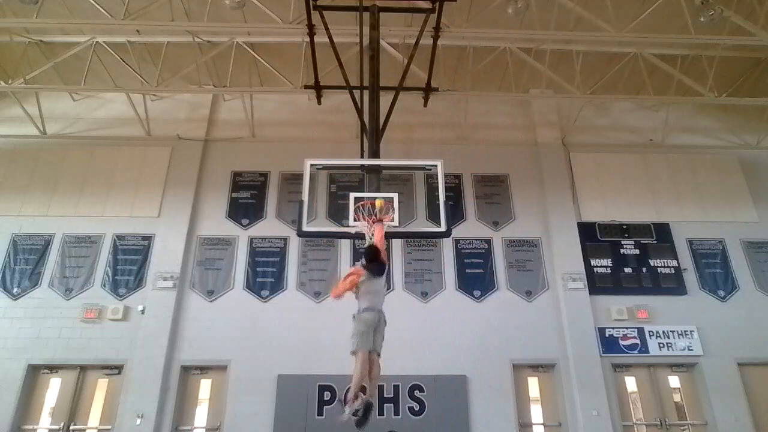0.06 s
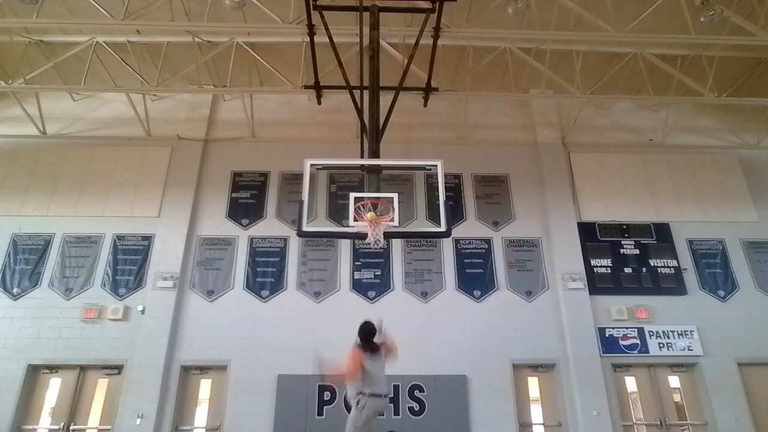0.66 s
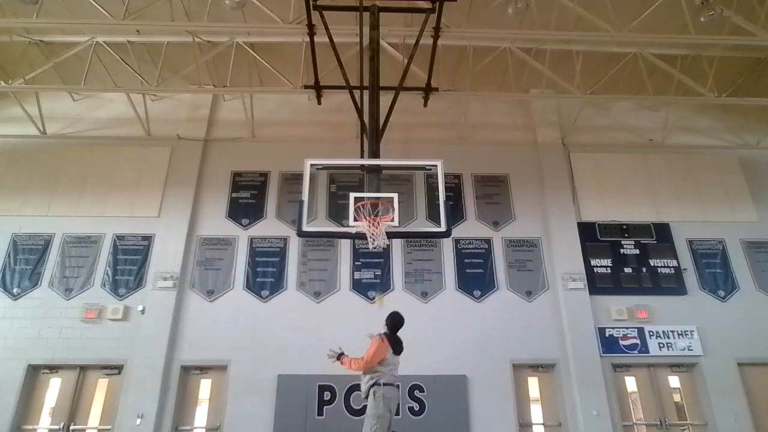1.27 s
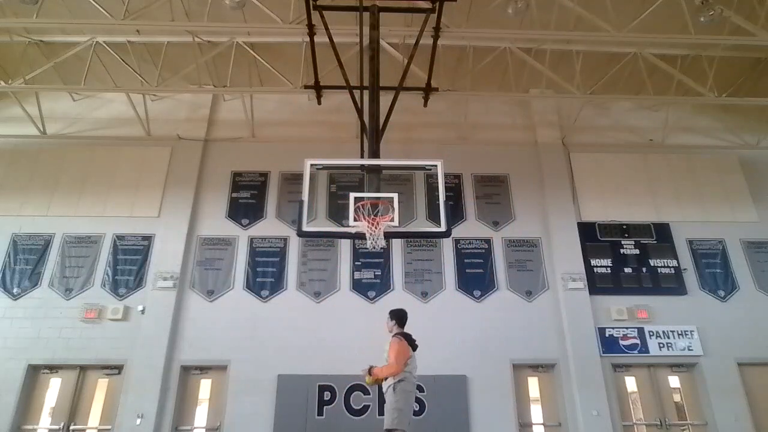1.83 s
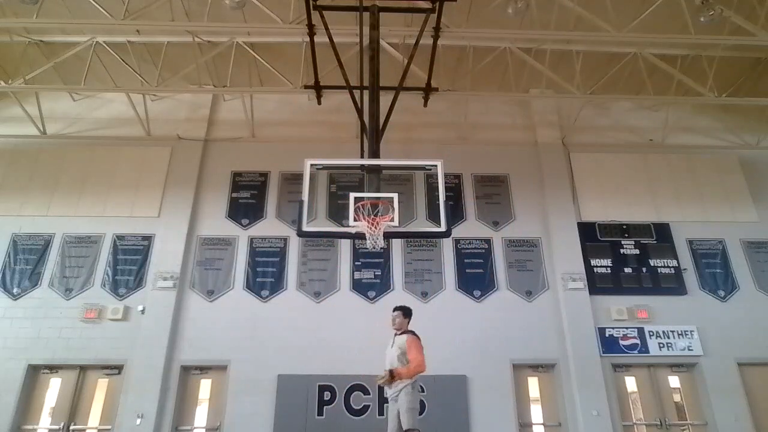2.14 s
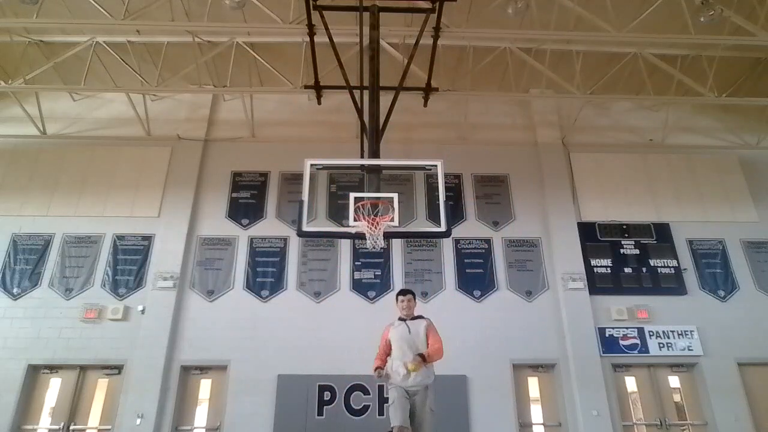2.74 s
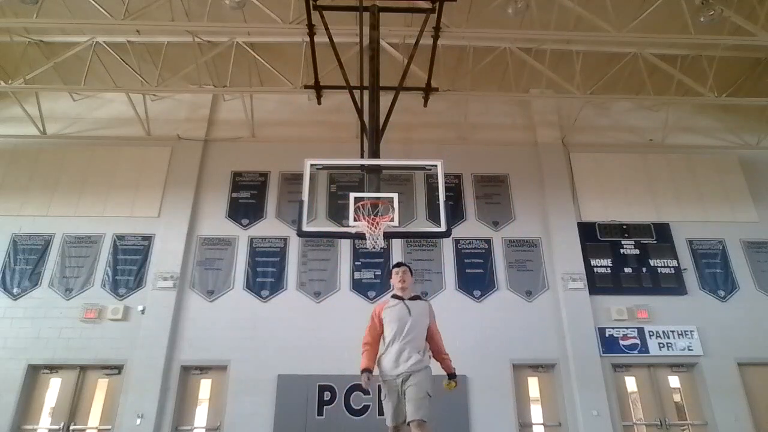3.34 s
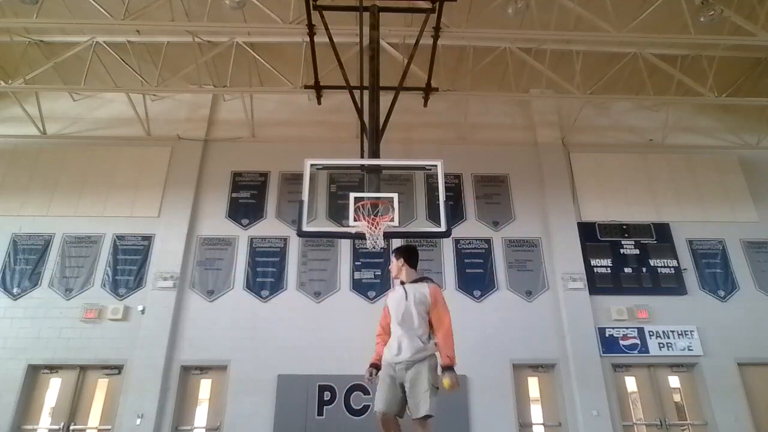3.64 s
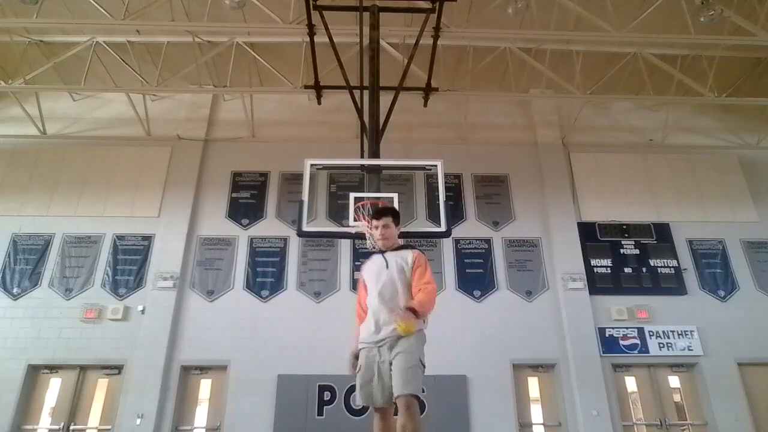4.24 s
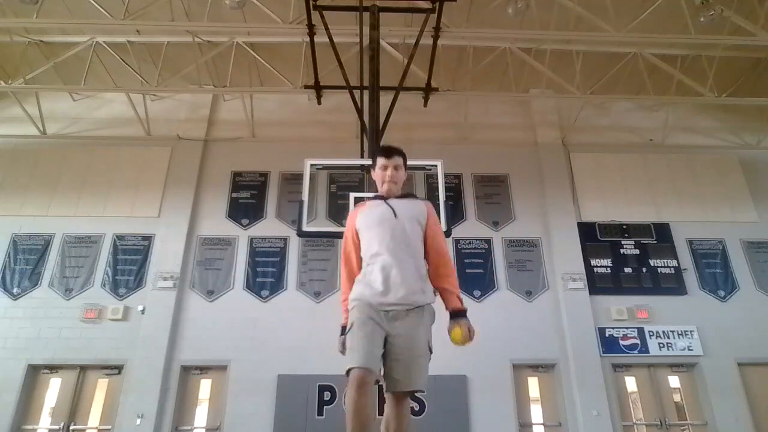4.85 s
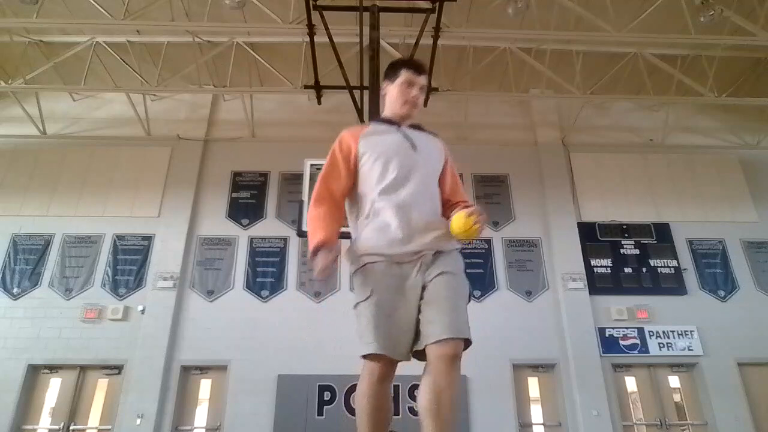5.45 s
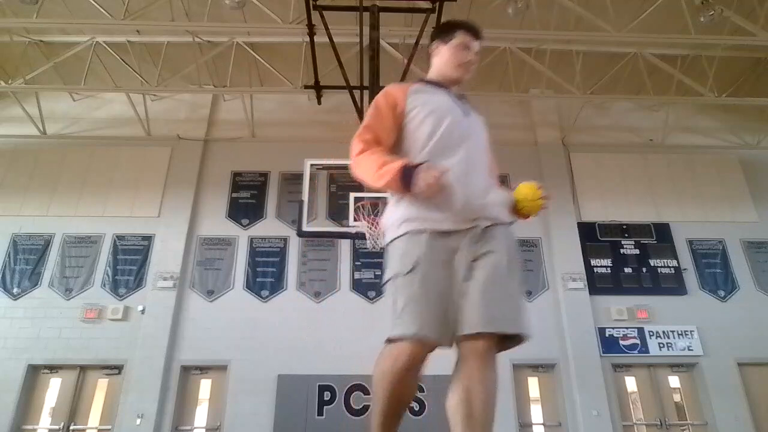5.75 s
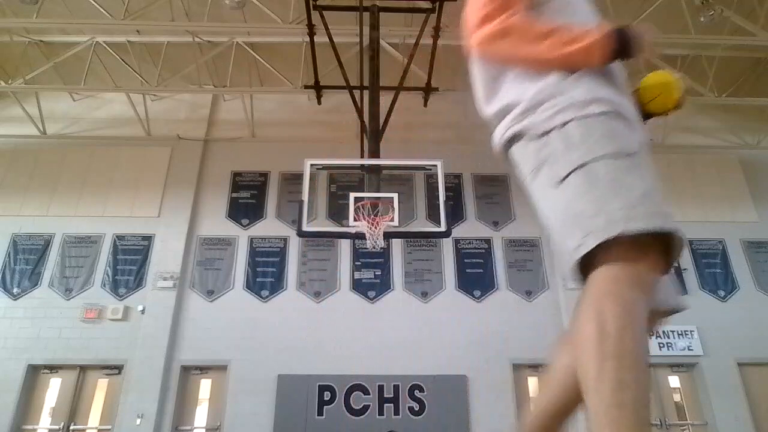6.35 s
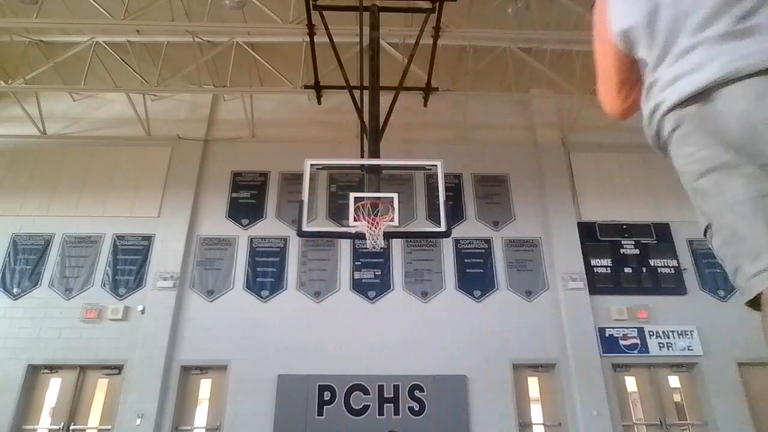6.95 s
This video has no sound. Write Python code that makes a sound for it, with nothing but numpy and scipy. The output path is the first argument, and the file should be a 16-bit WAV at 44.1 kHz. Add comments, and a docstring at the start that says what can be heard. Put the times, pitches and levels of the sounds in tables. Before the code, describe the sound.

Someone lands hard on a wooden gym floor under a hoop, the thud echoing, then walks closer with light taps and scuffs.

```python
"""A large school gym. A player jumps at the basketball hoop: the net swishes, the steel rim rings briefly,
and he lands on the sprung wooden floor, which heaves and sets the hall booming for two seconds.
He then walks up to the microphone, heels tapping the boards, soles scuffing and squeaking as they slip.
Underneath lie the rumble of the ventilation and a thin electronic whine."""
import sys
import numpy as np
from scipy import signal
from scipy.fft import rfft, irfft
from scipy.io import wavfile
from scipy.ndimage import uniform_filter1d, map_coordinates

SR = 44100
rng = np.random.default_rng(int(sys.argv[2]) if len(sys.argv) > 2 else 0)


def wav_out(sig):
    """Save sig, one row per channel (or a flat mono array), as 16-bit PCM at SR to the path in sys.argv[1]."""
    wavfile.write(sys.argv[1], SR, np.round(np.clip(np.atleast_2d(sig).T, -1, 1) * 32767).astype(np.int16))


N = 308700
TIME, FREQS = np.arange(N) / SR, np.arange(N // 2 + 1) * SR / N
LANDING_S = 0.61


def from_db(db):
    """Decibels as a gain."""
    return 10 ** (np.asarray(db) / 20)


def rms_one(x):
    """A signal scaled to rms 1."""
    return x / np.sqrt(np.mean(x ** 2) + 1e-20)


def in_time(rows):
    """An automation curve's value at every sample."""
    return np.interp(TIME, *np.transpose(rows))


def at_hz(points, hz):
    """A curve read along log frequency."""
    freqs, values = np.transpose(points)
    return np.interp(np.log(hz + 1e-3), np.log(freqs), values)


def add(track, s, sound):
    """Mixes a sound into the track at time s."""
    at = max(int(s * SR), 0)
    track[..., at:at + sound.shape[-1]] += sound[..., :N - at]


def band(order, low_hz, high_hz):
    """A band-pass filter."""
    return signal.butter(order, [low_hz, high_hz], "band", fs=SR, output="sos")


def resonate(x, hz, width_hz):
    """A two-pole resonance of gain 1."""
    r = np.exp(-np.pi * width_hz / SR)
    feedback = [1, -2 * r * np.cos(2 * np.pi * hz / SR), r * r]
    return signal.lfilter(np.array([1, 0, -1]) * (1 - r * r) / 2, feedback, x)


# Stereo width, side against mid: f/Hz, level/dB
WIDTH = [(40, -27), (120, -31.5), (280, -22), (600, -14.5), (1300, -11), (2500, -3), (4500, -3),
         (8000, 1.5), (13000, 0.5)]
def coloured(spectrum, white, side_db=0):
    """Shapes two noises into a stereo pair of rms 1, narrow in the bass and wide in the treble."""
    low_hz, high_hz = spectrum[0][0], spectrum[-1][0]
    passband = 1 / (1 + (low_hz / (FREQS + 1)) ** 8) / (1 + (FREQS / high_hz) ** 8)
    mid, side = rfft(white) * from_db(at_hz(spectrum, FREQS)) * passband
    side *= from_db(at_hz(WIDTH, FREQS) + side_db)
    return rms_one(irfft([mid + side, mid - side], N))


def noise(spectrum):
    """Smooth stereo noise."""
    return coloured(spectrum, rng.standard_normal((2, N)))


# Ventilation and microphone hiss: f/Hz, level/dB
AIR = [(38, -22), (65, -3), (92, -8), (146, -16.5), (319, -31), (358, -30.5), (420, -42), (941, -43.5),
       (1060, -43), (1270, -45), (1920, -46), (3340, -53), (10800, -48.5), (11900, -46.5), (16000, -51.5)]
# Colour of the low rumble: f/Hz, level/dB
RUMBLE = [(15, -7), (28, 0.5), (50, 0), (68, -17), (90, -14)]
# Its swell around the jump: t/s, level/dB
RUMBLE_FADER = [(0, -49), (.2, -50), (.35, -40), (1.1, -41), (1.7, -52), (7, -51.5)]
# Colour of a faint far wash: f/Hz, level/dB
WASH = [(200, 5), (500, 5), (1500, -6.5), (2600, -12.5), (4500, -16.5)]
# Its ebb and flow: t/s, level/dB
WASH_FADER = [(0, -54.5), (1.7, -64), (1.95, -61), (2.3, -61), (2.6, -72), (3.1, -78), (7, -69.5)]
# Thin tones of building and electronics: f/Hz, level/dB
WHINES = [(1085, -86), (11400, -76.5)]
def room_tone(rumble_db=-1.5, air_db=-52.5):
    """The bed: rumble, moving air, a far wash and steady whines."""
    rumble = from_db(in_time(RUMBLE_FADER) + rumble_db) * noise(RUMBLE)
    air = from_db(air_db) * noise(AIR)
    wash = from_db(in_time(WASH_FADER)) * noise(WASH)
    whine = sum(from_db(db) * np.sqrt(2) * np.sin(2 * np.pi * hz * TIME) for hz, db in WHINES)
    return rumble + air + wash + whine


# Reverb time of the hall: f/Hz, t60/s
HALL_T60 = [(40, 6), (120, 2.61), (400, 1.51), (1200, 2.4), (3000, 1.83), (6000, 1.43), (14000, 0.37)]
def die_away(x):
    """Each octave of a sound fades at the hall's own rate."""
    spectrum, out = rfft(x), np.zeros_like(x)
    octave = np.clip(np.log2((FREQS + 1) / 60), 0, 8)
    for k in range(9):
        part = irfft(spectrum * np.maximum(1 - abs(octave - k), 0), N)
        out += part * from_db(-60 * TIME / at_hz(HALL_T60, 60 * 2 ** k))
    return out


# Colour of the run-up's echo: f/Hz, level/dB
RUN_UP = [(59, -29), (100, -3.5), (149, -7), (190, -3), (295, -9.5), (583, -25.5), (631, -29.5),
          (2370, -30), (4970, -36.5), (6070, -43), (12000, -46.5), (15600, -75), (22000, -120)]
def run_up_echo(level_db=-38):
    """The run-up still hangs in the hall as the scene opens."""
    return from_db(level_db) * die_away(noise(RUN_UP))


# Colour of the reverb: f/Hz, level/dB
HALL_EQ = [(40, 2), (90, 1), (200, 3), (400, -3), (1000, -3), (2000, -6.5), (4000, -6), (8000, -8.5),
           (15000, -15.5)]
# He lingers under the hoop, then walks up close: t/s, distance/m
DISTANCE = [(0, 8.3), (2, 5.6), (4.6, 6.9), (7, 1.46)]
def hall_reverb(x, build_s=0.0025, unity_send_m=7.7):
    """The walls answer and the echo dies slowly; the send grows with the player's distance."""
    tail = die_away(noise([(20, 0), (20000, 0)])) * (1 - np.exp(-TIME / build_s))
    unit_energy = np.sqrt(2 * np.log(1000) / (at_hz(HALL_T60, FREQS) * SR))
    tail = irfft(rfft(tail) * unit_energy * from_db(at_hz(HALL_EQ, FREQS)), N)[:, :4 * SR]
    send = x * in_time(DISTANCE) / unity_send_m
    return signal.fftconvolve(send, tail, axes=1)[:, :N]


# Ticks of net, laces and clothing: t/s, level/dB, f/Hz
TICKS = [(0.247, -49, 4870), (0.4213, -36, 7900), (0.439, -39.5, 8700), (0.483, -43.5, 9000),
         (1.533, -51.5, 6170), (1.755, -52.5, 8400), (2.233, -61, 4200), (3.548, -61, 4200),
         (3.896, -45.5, 9800), (6.113, -47.5, 13000), (6.777, -47.5, 11600)]
def ticks(gain_db=4.5, t60=0.014, width_hz=6000):
    """Light hard touches: a few milliseconds of bright crackle."""
    out, t = np.zeros((2, N)), np.arange(SR // 20) / SR
    for s, level_db, hz in TICKS:
        white = rng.standard_normal((2, len(t))) + rng.standard_normal(len(t))
        burst = rms_one(resonate(resonate(white, hz, width_hz), hz, 2 * width_hz))
        add(out, s, from_db(level_db + gain_db - 60 * t / t60) * burst)
    return out


# Modes of the steel rim: f/Hz, level/dB, t60/s
RIM = [(2540, -51, 0.12), (2650, -35, 0.02), (3440, -60, 0.22), (4660, -42.5, 0.033)]
def rim(touch_s=0.45):
    """The touched rim rings briefly, damped by the net."""
    out, t = np.zeros(N), np.arange(SR // 2) / SR
    for hz, level_db, t60 in RIM:
        add(out, touch_s, from_db(level_db - 60 * t / t60) * np.sin(2 * np.pi * hz * t))
    return out


# Shoe chirps: t/s, level/dB, starting f/Hz, length/s
SQUEAKS = [(2.74, -64.5, 4640, 0.11), (2.785, -67, 1810, 0.008), (2.807, -62.5, 1320, 0.0089),
           (6.63, -54.5, 3393, 0.056), (6.8, -63, 2730, 0.035)]
def squeaks(gain_db=8.0, fall=0.128, roughness=0.16):
    """Rubber sticks and slips: a short, rough tone that sags in pitch."""
    out = np.zeros(N)
    for s, level_db, hz, length in SQUEAKS:
        along = np.linspace(0, 1, int(length * SR))
        jitter = rms_one(uniform_filter1d(rng.standard_normal(SR // 4), size=20))[:len(along)]
        phase = 2 * np.pi * np.cumsum(hz * (1 - fall * along + roughness * jitter)) / SR
        add(out, s, from_db(level_db + gain_db) * np.sin(np.pi * along) * np.sin(phase))
    return out


def slide(length, attack_s=0.015, hold_share=0.067):
    """Pressure envelope of a slide: it grips quickly, holds, then lets go."""
    release_at = attack_s + hold_share * (length - attack_s)
    return [(0, 0), (attack_s, 1), (release_at, 1), (length, 0)]


# The walk: t/s, thump/dB, tock/dB, heel skid/dB, time until the sole is flat/s, sole swish/dB
STEPS = [(3.366, -56, -66, -62, 0.1, -57.5), (4.484, -51.5, -61.5, -64, 0.087, -55),
         (5.053, -54.5, -56.5, -51.5, 0.1, -48), (5.611, -47, -45.5, -55, 0.1, -49),
         (6.160, -51.5, -47, -45.5, 0.14, -48), (6.718, -70, -53.5, -56, 0.092, -51.5)]
def step_cues(heave_db=6.5, heave_hz=209, click_db=-60.5, skid_s=0.041):
    """Cues for floor, taps and scuffs: the heel strikes and skids, then the sole rolls flat."""
    pushes, strikes, strokes = [], [], []
    colour_db = np.array([0, -9.5, -9.5])   # hiss, rub, grit
    for s, thump_db, tock_db, skid_db, flat_s, swish_db in STEPS:
        pushes.append((s, thump_db + heave_db, heave_hz))
        strikes.append((s, thump_db, tock_db, click_db))
        skid = (s, slide(skid_s), skid_db + colour_db)
        swish = (s, [(0.41 * flat_s, 0), (flat_s, 1), (1.143 * flat_s, 0)], swish_db + colour_db)
        rustle = (s + flat_s, [(0, 0), (0.03, 1), (0.24, 0)], (-67, -71, -71.5))   # other leg swings by
        strokes += [skid, swish, rustle]
    return pushes, strikes, strokes


def friction(spectrum, per_s, spread_db, smooth):
    """Many tiny slips of uneven size over a smooth noise, narrower in stereo than the reverb."""
    slips = (rng.random(N) < per_s / SR) * from_db(spread_db * np.minimum(rng.exponential(1, N), 4))
    bursts = rms_one(signal.lfilter([1], [1, -np.exp(-1 / 20)], slips + 1e-18))
    return coloured(spectrum, rng.standard_normal((2, N)) * (smooth + bursts), side_db=-11)


# Sliding net, rubber and cloth: t/s, length/s, hiss/dB, rub/dB, grit/dB
SCUFFS = [(0.225, 0.18, -61.5, -62, -52), (0.428, 0.16, -57, -64, -68), (0.592, 0.049, -40.5, -49.5, -44),
          (0.633, 0.4, -53, -60.5, -55.5), (1.046, 0.093, -59, -65, -68), (1.139, 0.077, -41, -48, -53),
          (1.217, 0.11, -55, -66, -73), (1.359, 0.15, -60.5, -64, -54.5), (1.535, 0.11, -55, -57.5, -53.5),
          (1.757, 0.12, -60, -68, -60.5), (2.729, 0.058, -48.5, -51, -61.5),
          (2.767, 0.11, -46, -55.5, -61.5), (2.887, 0.045, -55.5, -65, -68),
          (3.885, 0.09, -46.5, -54.5, -60.5), (5.498, 0.47, -65, -71.5, -87),
          (6.182, 0.051, -41.5, -47.5, -49.5), (6.616, 0.1, -30.5, -45.5, -52)]
# Sole on varnish: f/Hz, level/dB
HISS = [(4500, -85), (6200, -27), (7500, -11), (9500, -4), (10500, -2), (11800, -2.5), (13500, -11),
        (15500, -14), (20000, -52)]
# Pressed rubber: f/Hz, level/dB
RUB = [(2800, -10), (3600, -8), (4600, -6.5), (6200, -7), (7500, -1)]
# Dust under the sole: f/Hz, level/dB
GRIT = [(220, 8), (500, 4.5), (1100, 0.5), (2000, 3.5), (3000, 3)]
def scuffs(step_strokes, trims_db=(-2.0, -2.5, -2.5), pressure_power=0.68):
    """Pressure builds and lets go: slips hiss on top, rubber rubs lower, dust grinds underneath."""
    t, drive = np.arange(SR // 2) / SR, np.zeros((3, N))
    slides = [(s, slide(length), levels_db) for s, length, *levels_db in SCUFFS]
    for s, pressure, levels_db in slides + step_strokes:
        envelope = np.interp(t, *np.transpose(pressure)) ** pressure_power
        add(drive, s, np.outer(from_db(np.add(levels_db, trims_db)), envelope))
    hiss, rub, grit = drive
    return (hiss * friction(HISS, per_s=1300, spread_db=3.0, smooth=1.0)
            + rub * friction(RUB, per_s=980, spread_db=2.5, smooth=0.84)
            + grit * friction(GRIT, per_s=360, spread_db=3.5, smooth=1.0))


# Hard hits, mostly shoes on the boards: t/s, thump/dB, tock/dB, click/dB
TAPS = [(0.421, -52, -47, -53.5), (0.596, -35.5, -39, -43.5), (0.6, -37.5, -47, -45),
        (0.628, -45, -42, -51.5), (0.745, -39.5, -30.5, -39), (0.75, -68, -34.5, -47.5),
        (0.8, -40, -56, -43.5), (0.935, -49, -48.5, -70), (1.146, -52, -51.5, -59.5),
        (1.296, -78, -59, -60.5), (1.794, -54, -74, -72), (3.286, -85, -59.5, -68),
        (4.416, -86, -57.5, -72), (5.537, -70, -56, -61)]
def taps(heel_strikes, sole_lag_s=0.002373, sole_share=0.21, rattle_db=-22.5, rattle_t60=0.047):
    """Heel hits, sole follows, boards rattle: a floor thump, a sole tock and a hard-edge click."""
    out, t = np.zeros((2, N)), np.arange(SR // 12) / SR
    floor = band(2, 159, 510)
    edge = np.vstack([band(1, 1690, 4640), signal.butter(1, 1200, "high", fs=SR, output="sos")])
    for s, thump_db, tock_db, click_db in TAPS + heel_strikes:
        force = rng.standard_normal((2, len(t))) * from_db(rattle_db - 60 * t / rattle_t60)
        force[:, 0] += 1
        force[:, int(sole_lag_s * rng.uniform(.9, 1.1) * SR)] += sole_share
        mono = force.mean(axis=0)   # long waves reach both microphones alike
        reach_hz = np.interp(click_db - tock_db, [-16, -6], [1450, 2500])   # harder hits are brighter
        sole = band(3, 680, reach_hz)
        layers = (floor, mono, thump_db + 4), (sole, -mono, tock_db - 1.5), (edge, force, click_db - 2)
        for body, drive, level_db in layers:
            layer = signal.sosfilt(body, drive)
            layer /= np.sqrt(np.mean(layer ** 2) * len(t) / (.01 * SR))   # energy of 10 ms at rms 1
            add(out, s, from_db(level_db) * layer)
    return out


# Colour of the floor's shudder: f/Hz, level/dB
SHUDDER = [(44, -26), (75, -4.5), (118, -10.5), (183, -4.5), (227, -15), (276, -13.5), (340, -48),
           (440, -59), (750, -120)]
def shudder(level_db=-22.5, rise_s=0.16, t60=2.12):
    """Countless low modes of floor and hall swell after the landing and die together."""
    t = np.maximum(TIME - LANDING_S, 0)
    return from_db(level_db - 60 * t / t60) * (1 - np.exp(-t / rise_s)) * noise(SHUDDER)


# Low modes of floor and hall: f/Hz, relative level/dB, t60 before the cap/s
BOOM = [(69.8, 25, 4.4), (101.4, -16, 0.95), (123.6, 0, 0.58), (203, -5.5, 1.2), (245, -33, 4.8),
        (290, -10, 0.45)]
def boom(strongest_db=-42, rise_s=0.07, t60_cap=2.6):
    """A few low modes bloom after the landing and ring on."""
    out, t = np.zeros(N), np.arange(3 * SR) / SR
    gain_db = strongest_db - max(level_db for _, level_db, _ in BOOM)
    for hz, level_db, t60 in BOOM:
        envelope = from_db(level_db + gain_db - 60 * t / min(t60, t60_cap)) * (1 - np.exp(-t / rise_s))
        add(out, LANDING_S, envelope * np.sin(2 * np.pi * (hz * t + rng.random())))
    return out


# The landing's weight, a woody knock and a few deep pushes: t/s, level/dB, f/Hz
LANDING = [(0.592, -32, 900), (0.594, -24, 235), (0.608, -11, 213), (0.647, -10.5, 132),
           (0.699, -12, 115.3), (0.768, -17, 208)]
def floor_heave(heel_pushes, swell_cycles=0.95):
    """Each push of the landing or of a heel makes the sprung floor heave for a few cycles."""
    out, t = np.zeros(N), np.arange(3 * SR) / SR
    for s, level_db, hz in LANDING + heel_pushes:
        swell_s = swell_cycles / hz
        envelope = (t / swell_s * np.exp(1 - t / swell_s)) ** 2
        add(out, s, from_db(level_db) * envelope * np.sin(2 * np.pi * hz * t))
    return out


# He drifts left as he comes close: t/s, lead of the left channel/s, left minus right/dB
BEARING = [(0, 0, 0), (5.4, 0, 0), (6.2, .00006, .6), (6.65, .00009, 1.6), (7, .0001, 1.6)]
def pan(pair):
    """Off to one side, the direct sound reaches the near microphone earlier and louder."""
    rows = np.array(BEARING)
    lead_s, pan_db = in_time(rows[:, [0, 1]]), in_time(rows[:, [0, 2]])
    late_right = map_coordinates(pair[1], [np.arange(N) - lead_s * SR], order=5)
    return np.array([pair[0] * from_db(pan_db / 2), late_right * from_db(-pan_db / 2)])


def scene():
    """The mix: the player, the hall's answer and the bed."""
    pushes, strikes, strokes = step_cues()
    player = rim() + floor_heave(pushes) + boom() + taps(strikes) + ticks() + scuffs(strokes) + squeaks()
    return pan(player) + hall_reverb(player) + shudder() + run_up_echo() + room_tone()


# Treble balance of the two microphones: f/Hz, left minus right/dB
PORT_BALANCE = [(1500, 0), (7000, -1), (9300, -5), (10400, -1.5), (11800, 11.5), (13000, -1.5), (14500, 5)]
# Their ports resonate at different pitches: f/Hz, phase lead of the left/rad
PORT_PHASE = [(7500, 0), (9300, 0.27), (10700, 1.14), (12500, 0), (14000, 0.81)]
def record(dry, cutoff_hz=16000):
    """Each microphone port colours the treble in its own way; the top is cut steeply."""
    split = np.array([[.5], [-.5]])
    gain = from_db(at_hz(PORT_BALANCE, FREQS) * split)
    phase = at_hz(PORT_PHASE, FREQS) * split
    heard = irfft(rfft(dry) * gain * np.exp(1j * phase), N)
    return signal.sosfilt(signal.ellip(10, .2, 80, cutoff_hz, fs=SR, output="sos"), heard)


dry = scene()
out = record(dry)
wav_out(out)
```